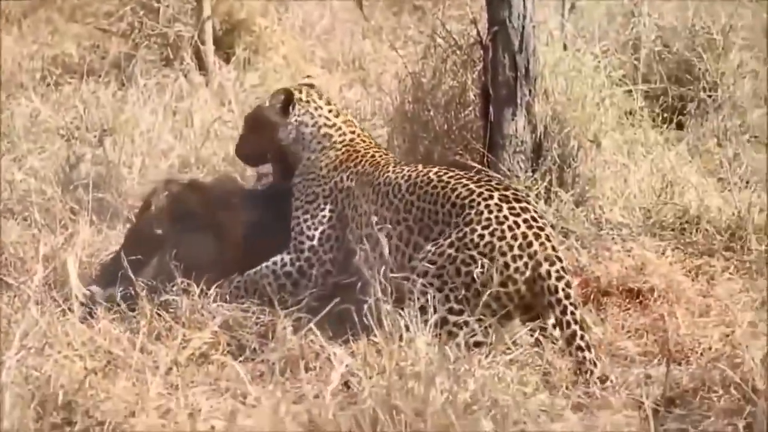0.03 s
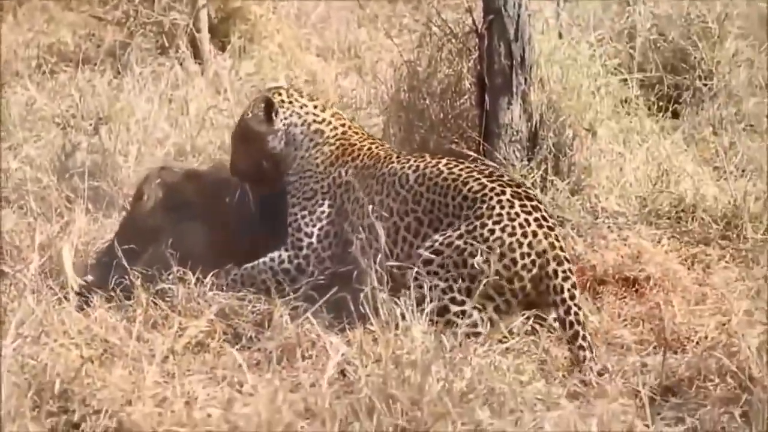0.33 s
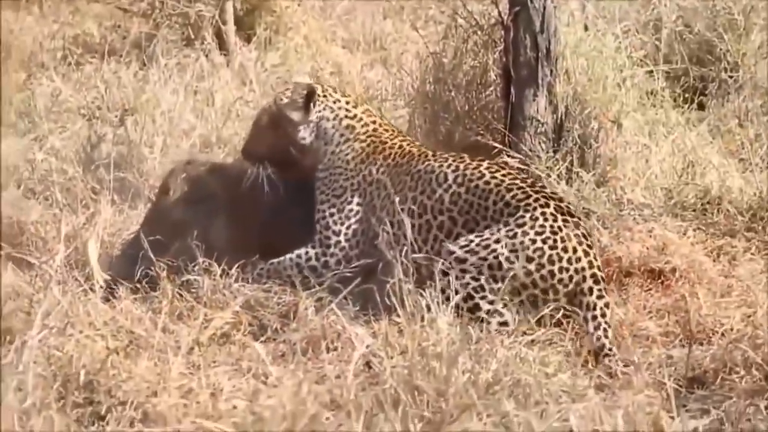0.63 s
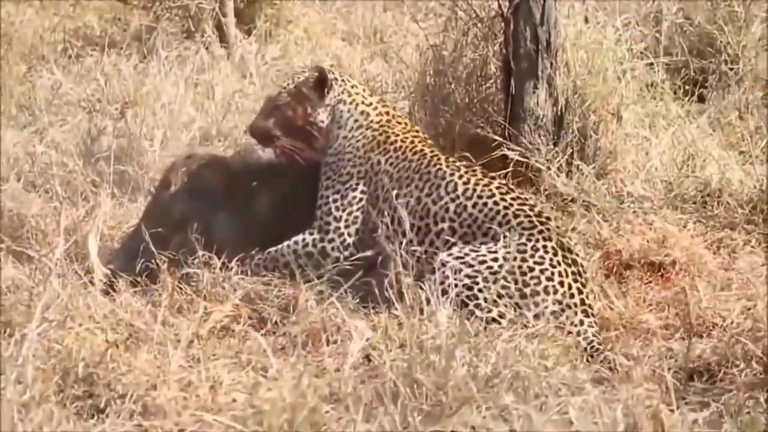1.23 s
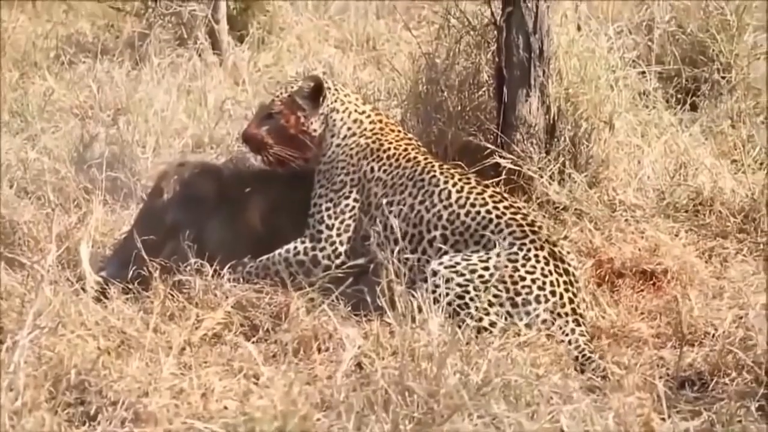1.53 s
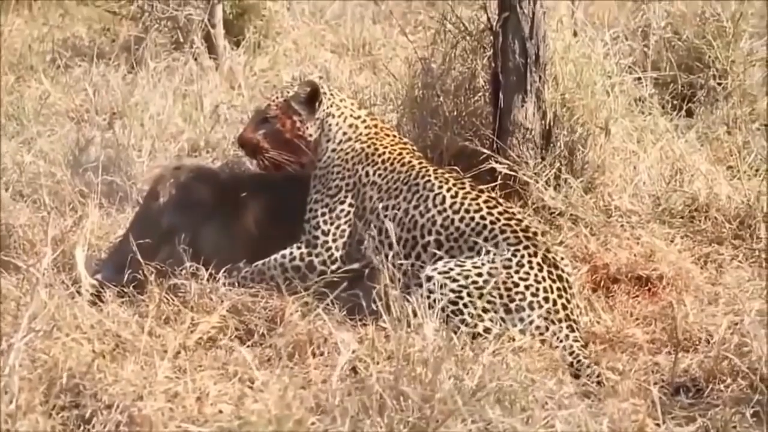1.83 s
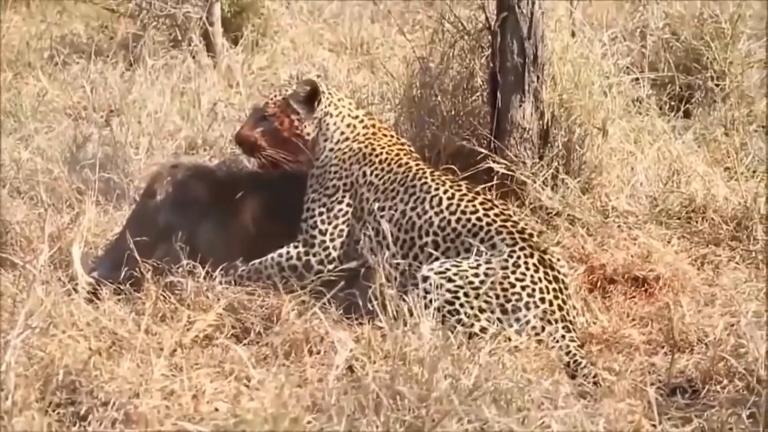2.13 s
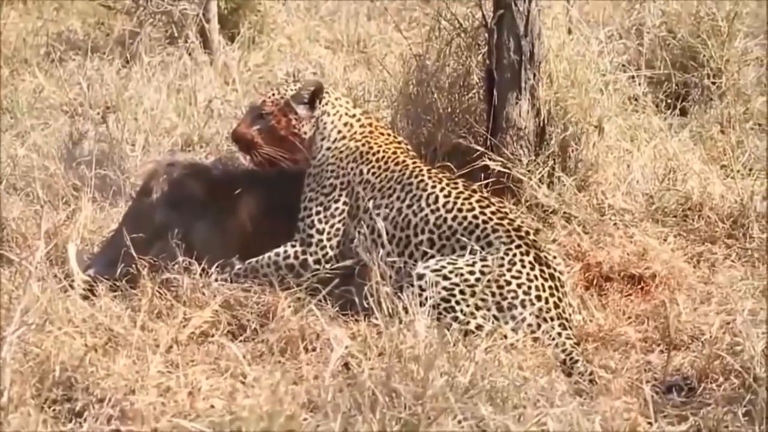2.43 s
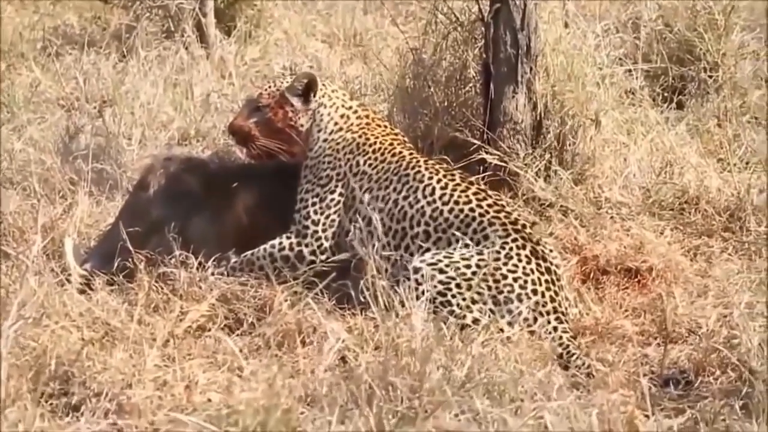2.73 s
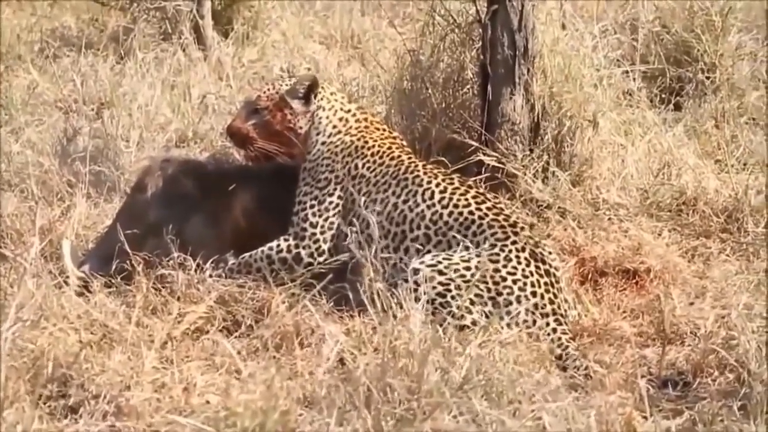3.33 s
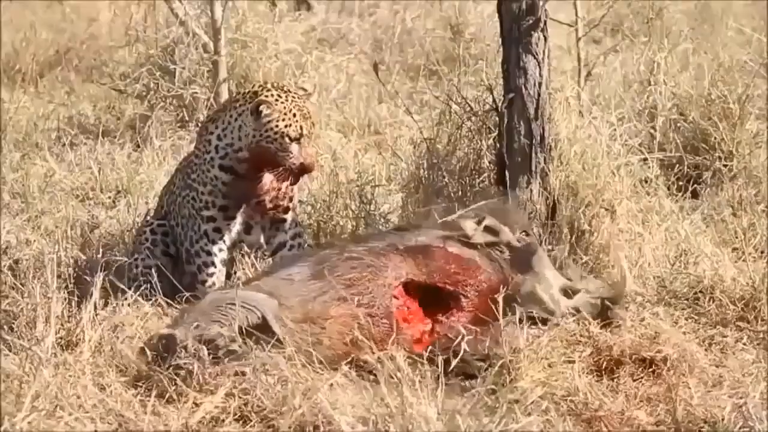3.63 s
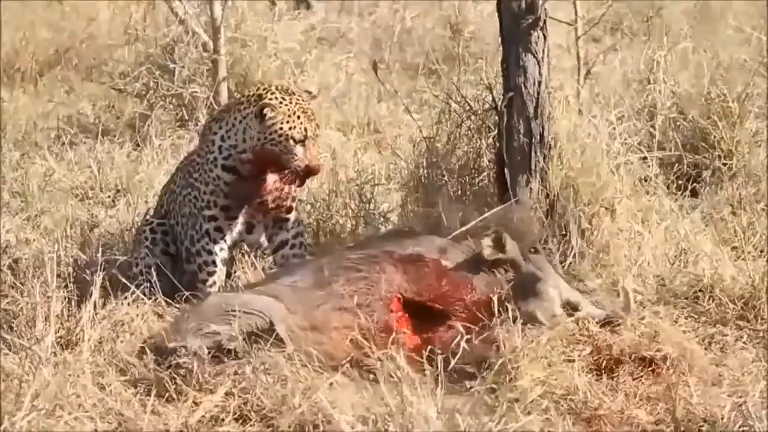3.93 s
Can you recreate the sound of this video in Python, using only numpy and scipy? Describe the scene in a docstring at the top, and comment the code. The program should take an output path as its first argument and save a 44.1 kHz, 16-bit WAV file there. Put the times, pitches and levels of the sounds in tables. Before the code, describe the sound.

Three harsh, high squeals of a warthog in distress ring out in quiet open bush.

```python
"""Warthog squealing in dry bush

A warthog held by a leopard squeals three times in open bush. Its throat has two oscillators:
a shrill whistle near 2 kHz, chopped by a low voice that slips into period doubling and rasps.
Grass rustles, a bird calls far off and wind bumps the microphone. At the very end the sound
cuts to a duller, rumbling outdoor hiss."""
import sys
import numpy as np
from scipy import signal
from scipy.fft import rfft, irfft
from scipy.io import wavfile
from scipy.ndimage import uniform_filter1d

SR = 44100
rng = np.random.default_rng(int(sys.argv[2]) if len(sys.argv) > 2 else 0)


def file_out(sig):
    """Save sig as 16-bit WAV at sys.argv[1]."""
    # one column per channel
    cols = np.atleast_2d(sig).T
    # limit, then scale
    lim = np.clip(cols, -1, 1)
    pcm = np.round(lim * 32767).astype(np.int16)
    wavfile.write(sys.argv[1], SR, pcm)


N = 176400
TIME = np.arange(N) / SR


def squeals():
    """The low voice chops the whistle, so each whistle harmonic has sidebands; air rasps in step."""
    # One list a squeal. Each row: time in seconds, whistle pitch in Hz.
    whistle_pitch = [
        [(0, 2046), (.1, 2085), (.22, 2083), (.26, 2065), (.47, 2113), (.55, 2172), (.69, 2160), (.79, 2070),
         (.835, 1690), (.872, 1130), (.89, 1035)],
        [(1.829, 1834), (1.853, 2030), (1.885, 2084), (1.98, 2140), (2.1, 2163), (2.25, 2122), (2.503, 2085),
         (2.553, 1480), (2.595, 1110)],
        [(3.321, 1673), (3.343, 1740), (3.351, 2007), (3.385, 2104), (3.46, 2155), (3.72, 2141), (3.81, 2049)],
    ]
    # Each row: time in seconds, pitch of the low voice in Hz.
    voice_pitch = [(0, 383.4), (.27, 343), (.37, 357.9), (.465, 364), (.5, 321.7), (.55, 371), (.6, 324),
                   (.74, 345.3), (.85, 271.5), (1.84, 385.8), (2.04, 356.8), (2.15, 377.5), (2.35, 375.1),
                   (2.56, 295.7), (3.42, 392.5), (3.5, 363.8), (3.78, 355.9)]
    # Each row: time in seconds, period doubling 0-1, roughness 0-1, rasp level in dB.
    throat = [(.17, 0.08, 0.13, -38), (.25, 0.62, 0.11, -37), (.41, 0.53, 0.54, -40),
              (.55, 0.66, 0.33, -34.5), (.77, 0.77, 0.14, -38.5), (.86, 0.46, 0.65, -47),
              (1.83, 0.13, 0.35, -42), (1.93, 0.37, 0.02, -38.5), (2.03, 0.74, 0.34, -32.5),
              (2.3, 0.6, 0.36, -31.5), (2.48, 1, 0.4, -37), (2.56, 0.56, 0.52, -43),
              (3.32, 0.07, 0.16, -44), (3.38, 0.18, 0.29, -44.5), (3.57, 0.75, 0.63, -25),
              (3.65, 0.86, 0.22, -30)]
    # One list a squeal. Each row: time in seconds, then dB of low voice and whistle harmonics 1-3.
    levels = [
        [(0, -32.5, -34.5, -25, -39), (.17, -29, -31.5, -21, -33.5), (.27, -39, -33, -20.5, -29.5),
         (.46, -38.5, -31, -21.5, -32.5), (.55, -38, -34.5, -29, -43), (.61, -37, -38, -35, -62),
         (.76, -36.5, -38.5, -35.5, -47), (.835, -47, -47, -36.5, -41.5), (.89, -69, -41, -76, -54)],
        [(1.83, -69, -37, -41, -32), (1.868, -38, -25, -22, -24.5), (1.91, -43.5, -24.5, -23.5, -21.5),
         (1.98, -34.5, -28, -23.5, -35.5), (2.22, -29.5, -31.5, -26.5, -33.5), (2.42, -38, -33.5, -28.5, -30.5),
         (2.5, -50, -35, -26.5, -30.5), (2.535, -42.5, -43.5, -36.5, -46), (2.6, -76, -38, -72, -44.5)],
        [(3.322, -80, -38, -34, -34), (3.346, -42, -32.5, -29.5, -33), (3.362, -65, -24, -19, -18),
         (3.43, -37, -26.5, -20.5, -23), (3.52, -41.5, -28, -23, -28), (3.765, -35, -33.5, -25.5, -30.5)],
    ]
    # Times in seconds where the throat catches: low voice, rasp and air dip briefly.
    catches = [.215, .342, .491, .66]
    catch_s, catch_depth, release_s = .01, .6, 0.041
    slack_hz, taut_hz = 1750, 2030

    doubling, rough, rasp_db = in_time(throat)
    whistle_hz, = in_time([row for call in whistle_pitch for row in call])
    voice_hz, = in_time(voice_pitch)
    voice_gain, *harmonic_gains = from_db(in_time([row for call in levels for row in call]))
    flow = 1 - catch_depth * sum(np.exp(-((TIME - s) / catch_s) ** 2) for s in catches)
    gate = sum((TIME >= call[0][0]) * np.sqrt(np.clip((call[-1][0] - TIME) / release_s, 0, 1))
               for call in whistle_pitch)

    slack = 1 - np.clip((whistle_hz - slack_hz) / (taut_hz - slack_hz), 0, 1)
    jitter = rough * (0.005 + .018 * slack) * drift(108) + 0.0015 * drift(22)
    phase = 2 * np.pi * np.cumsum(whistle_hz * (1 + jitter)) / SR
    # The doubled cycle turns once for every two periods of the low voice.
    cycle = np.pi * np.cumsum(voice_hz * (1 + 0.02 * rough * drift(52.34))) / SR
    chop = 1 + 0.17 * (doubling * np.cos(cycle) + (1 - doubling) * np.cos(2 * cycle))

    cry = flow * voice_gain * low_voice(cycle, doubling, rough)
    bands = sidebands(cycle, doubling, rough, slack)
    cry += whistle(phase, bands, harmonic_gains, rough, slack)
    treble = throat_treble(phase, cycle, bands[1], rough, chop, air=doubling * flow)
    cry += harmonic_gains[1] ** 0.78 * treble   # follows part of harmonic 2's swing
    cry += from_db(rasp_db) * flow * rasp(cycle, doubling, rough, chop)
    return uniform_filter1d(gate, size=260) * cry


def whistle(phase, bands, gains, rough, slack, flicker_db=7, lag_rad=0.91):
    """Harmonics 1-3 of the whistle, the higher ones trailing; a slack whistle breaks up."""
    out = 0
    for k, (lines, gain) in enumerate(zip(bands, gains), 1):
        breaking = from_db(flicker_db * rough * slack * drift(34))
        harmonic = lines * np.exp(1j * (k * phase - lag_rad * k ** 2))
        out += gain * breaking * roughened(harmonic, rough)
    return out


def sidebands(cycle, doubling, rough, slack, slack_db=-8):
    """Chopping sets lines around whistle harmonics 1-3; they weaken as the whistle goes slack."""
    # Relative dB of the lines -2 to +4 half voice pitches from any harmonic, with a plain voice.
    plain = [-14, -42.5, 7, -18.5, 0.5, -25.5, -24]
    # Each row: the same lines for one harmonic, with a doubled voice.
    doubled = [
        [-24, -45.5, 0.0049, -16, -9.5, 6, -11],
        [-40, -60, 0.012, -4, 3.5, 3.5, -30],
        [-5.5, -5.5, 0.0071, -6, -13, -15, -15],
    ]
    return [partials(np.arange(-2, 5), plain, row, cycle, doubling, rough, slack_db * slack)
            for row in doubled]


def low_voice(cycle, doubling, rough, flutter_db=11):
    """The low oscillator: period doubling raises partials between its harmonics."""
    # A plain row, then a doubled row: relative dB at 1-9 times half the voice pitch.
    partial_db = [
        [-36, 0.017, -35, -10, -16.5, -20, -50, -17, -28.5],
        [-6, 0.014, -11.5, -15.5, -21, -3.5, -40, -5, -25],
    ]
    flutter = from_db(flutter_db * rough * drift(25))
    return flutter * roughened(partials(np.arange(1, 10), *partial_db, cycle, doubling, rough), rough)


def throat_treble(phase, cycle, lines, rough, chop, air, flutter_db=2):
    """Whistle harmonics 4-7 and breath, chopped by the voice, pass the throat's resonances."""
    # Each row: frequency in Hz, gain of the throat in dB.
    resonances = [(2800, -14.5), (4300, 8), (5200, -4), (6200, 27.5), (7500, 6.5), (8700, 0), (10100, 2),
                  (11000, 3), (12300, 13), (13200, -2.5), (14100, -1), (15200, -30)]
    # The treble flares in the first squeal: start in seconds, length in seconds, boost in dB.
    flare = (.455, .09, 6)
    # Harmonics 5-7 sit one voice pitch higher.
    harmonics = sum(roughened(lines * np.exp(1j * (k * phase + 2 * cycle * (k > 4))), rough)
                    for k in range(4, 8))
    breath = air * band(rng.standard_normal(N), 10400, spread=0.18)
    treble = coloured(chop * (harmonics + breath), resonances)
    start, length, flare_db = flare
    return treble * from_db(-27 + flare_db * swell(start, length, skew=0.8) + flutter_db * drift(20))


def rasp(cycle, doubling, rough, chop):
    """The folds snap once a period, every second snap fading as the voice doubles; air joins in."""
    # Each row: frequency in Hz, relative gain of the throat in dB.
    resonances = [(120, -62), (300, 1.5), (520, -1.5), (850, -6.5), (1400, 8.5), (1850, -18), (2500, 2.5),
                  (3050, -7), (4500, 6), (5400, -5), (6600, -4.5), (7600, -12), (15500, -5.5)]
    count = np.floor(cycle / np.pi)
    snaps = np.diff(count, prepend=0) * (1 - doubling * (count % 2))
    snaps *= 1 + rough * rng.standard_normal(N)
    breath = chop * rng.standard_normal(N)
    return rms_one(coloured(1.8 * rms_one(snaps) + breath, resonances))


def scatter(x, level_db=-16.5, t60_s=0.18, delay_s=0.054):
    """A faint, quickly dying tail comes back from grass and trunks."""
    tail = rng.standard_normal(N) * from_db(-60 * TIME / t60_s) * (TIME > delay_s)
    return from_db(level_db) * signal.fftconvolve(x, tail / np.sqrt(np.sum(tail ** 2)))[:N]


def grass(grain_db=4):
    """Dry stalks crackle in short flurries."""
    # Each row: start in seconds, length in seconds, level in dB, band centre in Hz.
    rustles = [(1.309, 0.049, -50, 2100), (1.379, 0.075, -51.5, 5300), (1.48, 0.051, -51, 2750),
               (1.585, 0.044, -52.5, 5490), (1.687, 0.063, -51.5, 2950), (1.761, 0.085, -48, 2100),
               (3.277, 0.015, -45.5, 4168), (3.508, 0.032, -31, 2370), (3.531, 0.0088, -21.5, 2800),
               (3.544, 0.019, -30, 1230), (3.603, 0.022, -27, 2600)]
    grains = rng.standard_normal(N) * from_db(grain_db * drift(250))
    return sum(from_db(db) * swell(start, length, skew=1) * band(grains, hz, spread=0.42)
               for start, length, db, hz in rustles)


def far_bird():
    """Two thin, unsteady notes from far off, bending downwards."""
    # Each row: start in seconds, length in seconds, first and last pitch in Hz, level in dB.
    notes = [(1.41, 0.077, 3550, 3330, -50.5), (1.53, 0.11, 3370, 3000, -51.5)]
    out, waver = 0, 1 + 0.013 * drift(167)
    for start, length, first_hz, last_hz, db in notes:
        hz = waver * (first_hz + (last_hz - first_hz) * np.clip((TIME - start) / length, 0, 1) ** 2)
        out += from_db(db) * swell(start, length, skew=0.54) * np.sin(2 * np.pi * np.cumsum(hz) / SR)
    return out


def wind():
    """Low puffs of wind bump the microphone."""
    # Each row: start in seconds, length in seconds, level in dB.
    bumps = [(2.839, 0.066, -47), (3.021, 0.036, -37.5), (3.064, 0.023, -41.5), (3.488, 0.049, -37)]
    puffs = sum(from_db(db) * swell(start, length, skew=0.66) for start, length, db in bumps)
    return puffs * band(rng.standard_normal(N), hz=60.2, spread=0.4575)


def bush_air():
    """The faint, wavering hiss of open bush all around."""
    # Each row: frequency in Hz, relative level in dB.
    spectrum = [(25, -13.5), (267, -4.5), (614, -6.5), (1080, -19), (1380, -16), (1620, -18), (4150, -22),
                (15500, -31.5)]
    # Each row: time in seconds, level in dB.
    levels = [(1.0, -50.5), (1.75, -49.5), (2.2, -57.5), (3.3, -52)]
    level_db, = in_time(levels)
    return from_db(level_db + drift(26)) * noise(spectrum)


def dull_air(level_db=-34, top_hz=5440):
    """Dull outdoor hiss over a low rumble."""
    # Each row: frequency in Hz, relative level in dB.
    spectrum = [(15, -39.5), (25, -15), (123, -5), (342, -24), (777, -20), (1010, -23), (3430, -20.5),
                (5000, -38.5), (6500, -63)]
    air = signal.sosfilt(signal.butter(14, top_hz, fs=SR, output="sos"), noise(spectrum))
    return from_db(level_db + 1.17 * drift(27.5)) * air


def partials(steps, plain, doubled, cycle, doubling, rough, side_db=0):
    """Lines half a voice pitch apart, moving from plain to doubled levels, of unit power together."""
    flicker_db, smear_rad = 7, 0.2417   # outer lines lag and soften each pulse
    wave, power = 0, 0
    for step, plain_db, doubled_db in zip(steps, plain, doubled):
        db = plain_db + (doubled_db - plain_db) * doubling + side_db * (step != 0)
        gain = from_db(db + flicker_db * rough * drift(12.3))
        wave += gain * np.exp(1j * (step * cycle - smear_rad * step ** 2))
        power += gain ** 2
    return wave / np.sqrt(power)


def roughened(wave, rough, width_hz=150):
    """Cycle-to-cycle chance widens each line of a complex wave; the result is real."""
    shake = .3 * rough
    wobble = 1 + shake * (drift(width_hz) + 1j * drift(width_hz))
    return np.real(wave * wobble) / np.sqrt(.5 + shake ** 2)


def from_db(db):
    """Decibels to gain."""
    return 10 ** (np.asarray(db) / 20)


def rms_one(x):
    """Scale to unit rms."""
    return x / np.sqrt(np.mean(x ** 2) + 1e-20)


def in_time(rows):
    """Rows of (seconds, values..) to one curve a value column, at every sample."""
    seconds, *columns = np.transpose(rows)
    return [np.interp(TIME, seconds, column) for column in columns]


def drift(hz):
    """Smooth random wander of unit rms, mostly slower than hz."""
    pole = np.exp(-16 * np.pi * hz / SR)
    slow = signal.lfilter([1], [1, -2 * pole, pole * pole], rng.standard_normal(N // 8 + 2002))[2000:]
    return np.interp(np.arange(N) / 8, np.arange(len(slow)), rms_one(slow))


def coloured(x, spectrum):
    """Filter by rows of (Hz, dB)."""
    hz, db = np.transpose(spectrum)
    bins = np.maximum(np.arange(N // 2 + 1) * SR / N, 1)
    return irfft(rfft(x) * from_db(np.interp(np.log(bins), np.log(hz), db)), N)


def noise(spectrum):
    """Coloured noise of unit rms."""
    return rms_one(coloured(rng.standard_normal(N), spectrum))


def band(x, hz, spread):
    """Band around a centre, unit rms."""
    edges = [hz / (1 + spread), min(hz * (1 + spread), SR / 2 - 1000)]
    return rms_one(signal.sosfilt(signal.butter(2, edges, "band", fs=SR, output="sos"), x))


def swell(start, length, skew):
    """One smooth hump; a skew under 1 brings its top forward."""
    return np.sin(np.pi * np.clip((TIME - start) / length, 0, 1) ** skew)


def scene():
    """The struggle in the bush, a brief dip, then dull hiss; both channels alike."""
    cut_s, resume_s, dip_db = 3.773, 3.803, -22.5
    cries = squeals()
    struggle = cries + scatter(cries) + far_bird() + grass() + wind() + bush_air()
    before = uniform_filter1d(1. * (TIME < cut_s), size=130)
    dip = from_db(dip_db) * (TIME < resume_s)
    after = uniform_filter1d(1. * (TIME >= resume_s), size=100)
    mono = struggle * np.maximum(before, dip) + dull_air() * after
    return np.array([mono, mono])


def record(dry):
    """The top is cut steeply at 15.4 kHz."""
    return signal.sosfilt(signal.ellip(10, .2, 80, 15400, fs=SR, output="sos"), dry)


dry = scene()
out = record(dry)
file_out(out)
```